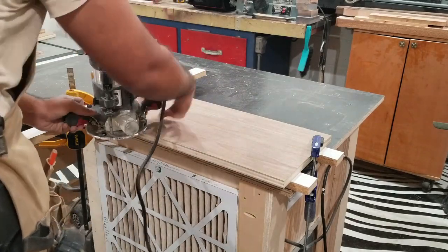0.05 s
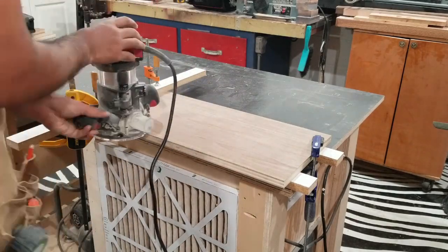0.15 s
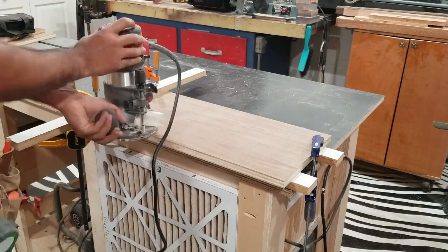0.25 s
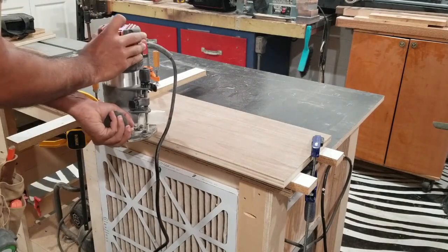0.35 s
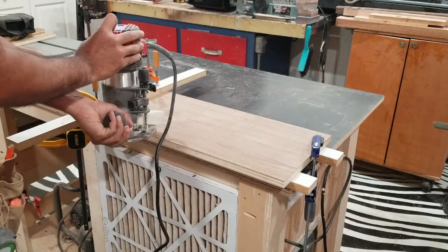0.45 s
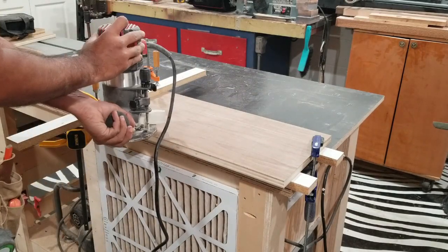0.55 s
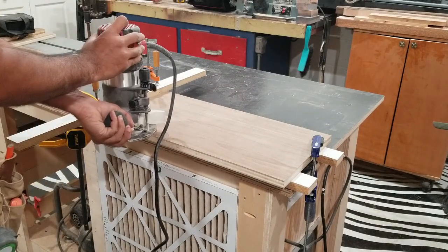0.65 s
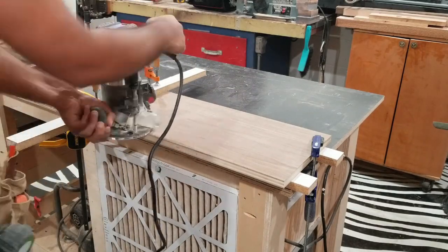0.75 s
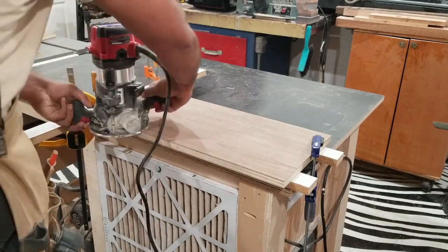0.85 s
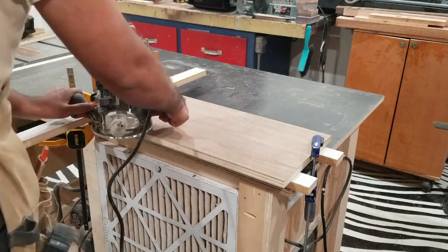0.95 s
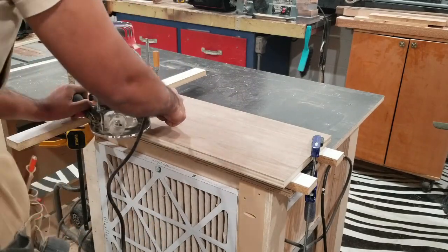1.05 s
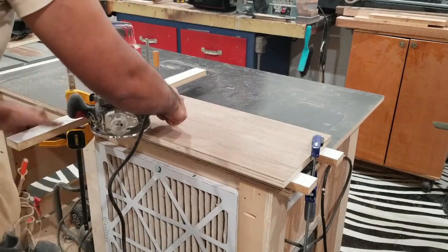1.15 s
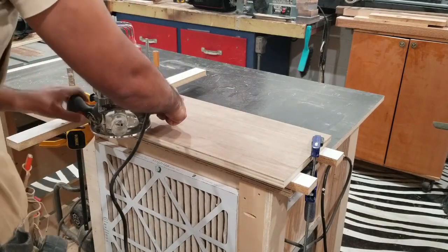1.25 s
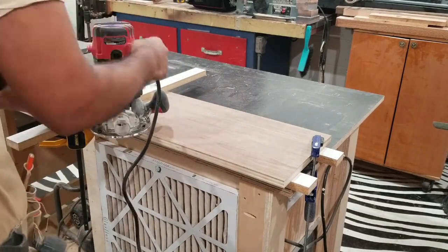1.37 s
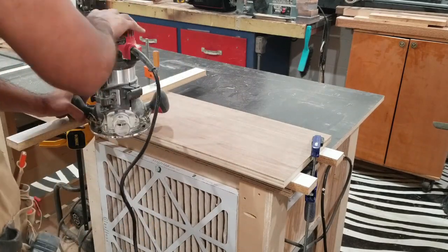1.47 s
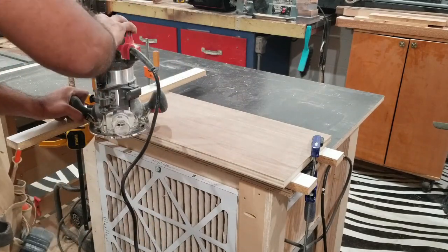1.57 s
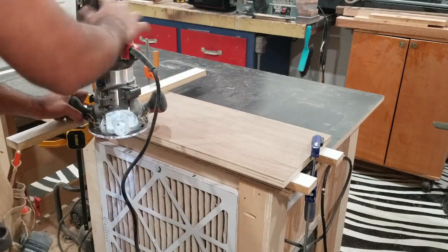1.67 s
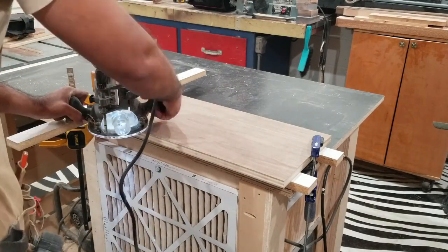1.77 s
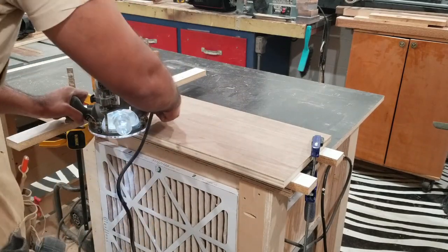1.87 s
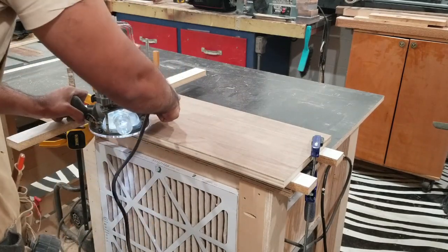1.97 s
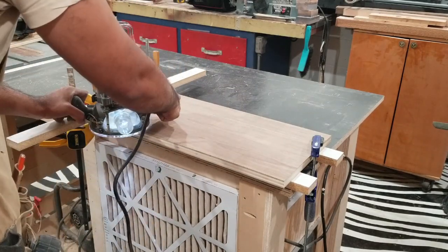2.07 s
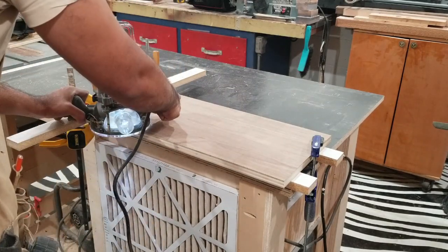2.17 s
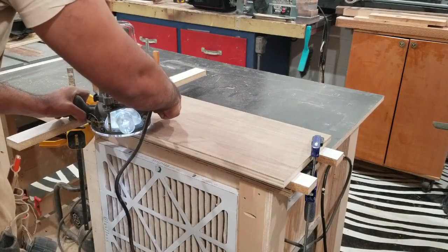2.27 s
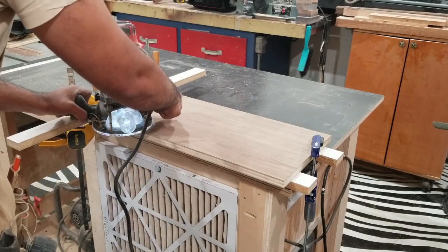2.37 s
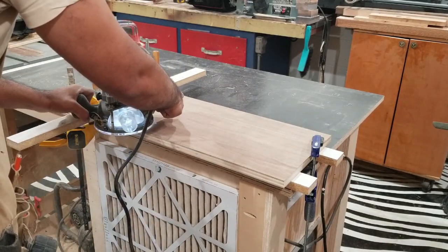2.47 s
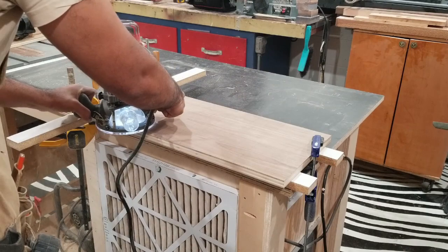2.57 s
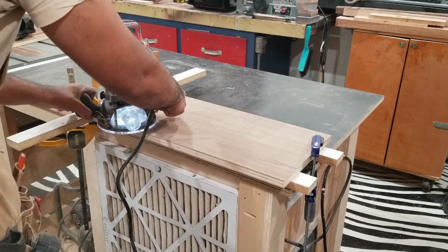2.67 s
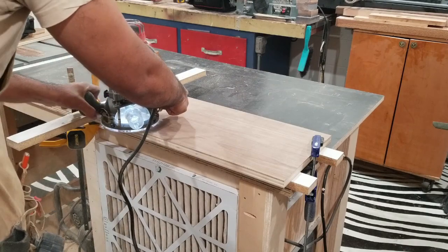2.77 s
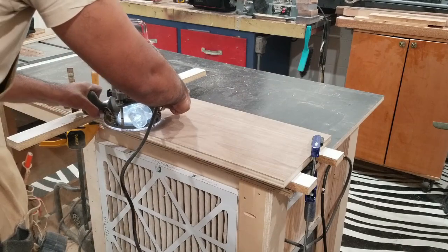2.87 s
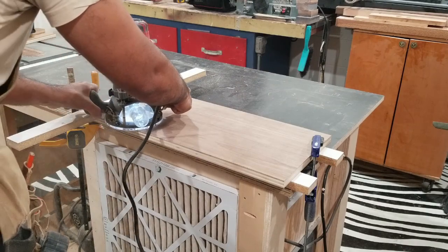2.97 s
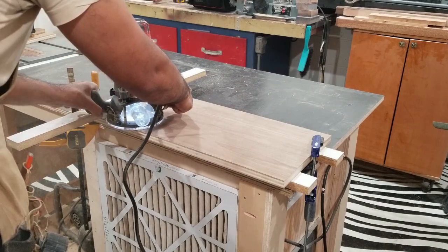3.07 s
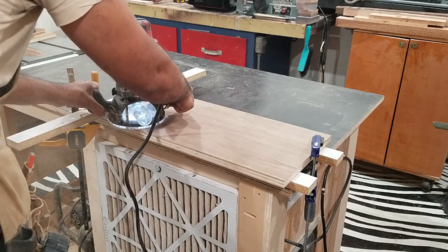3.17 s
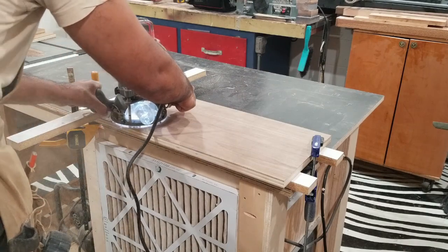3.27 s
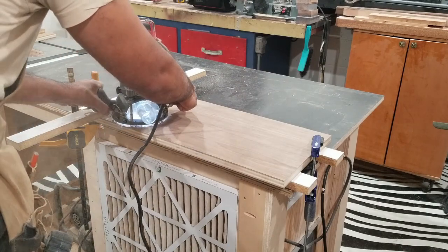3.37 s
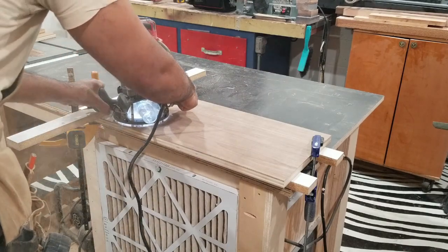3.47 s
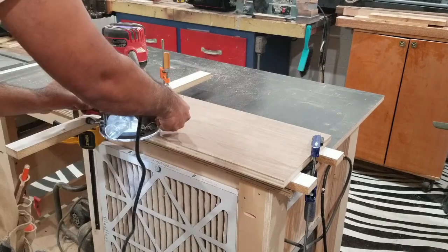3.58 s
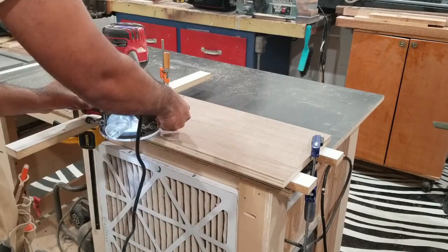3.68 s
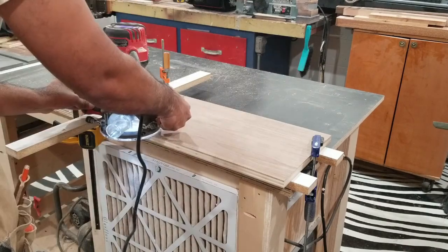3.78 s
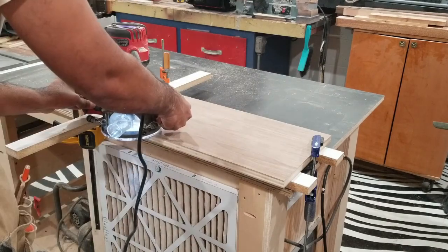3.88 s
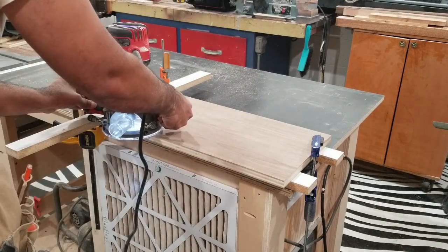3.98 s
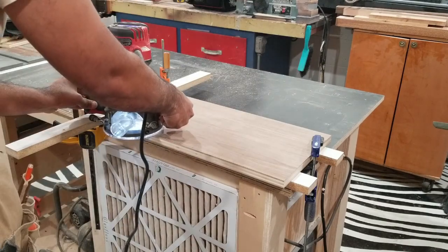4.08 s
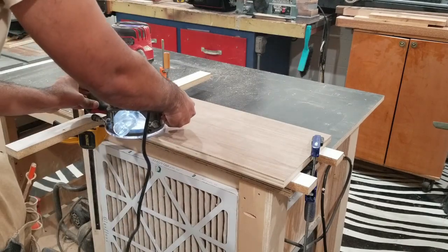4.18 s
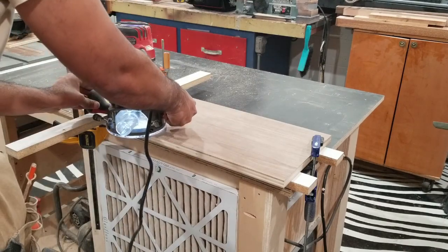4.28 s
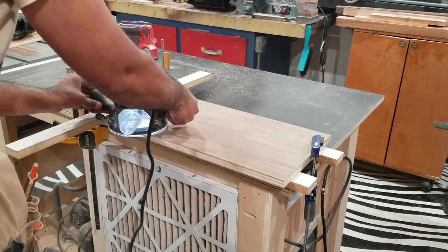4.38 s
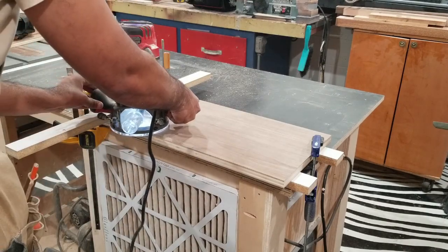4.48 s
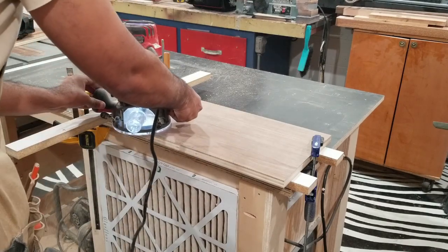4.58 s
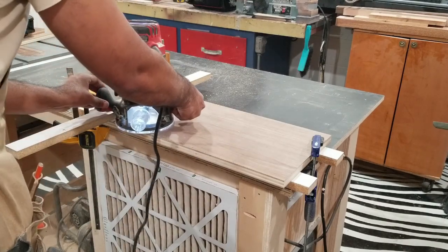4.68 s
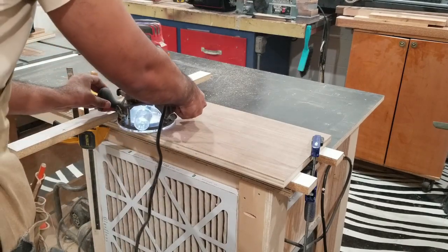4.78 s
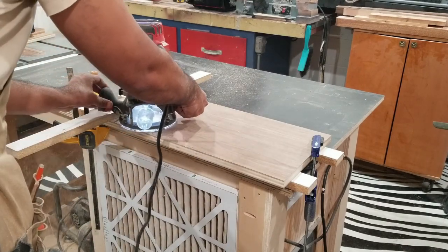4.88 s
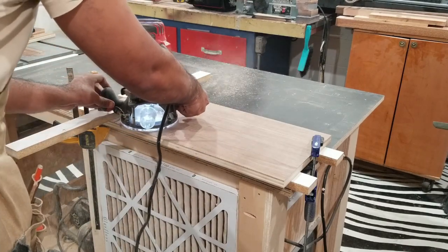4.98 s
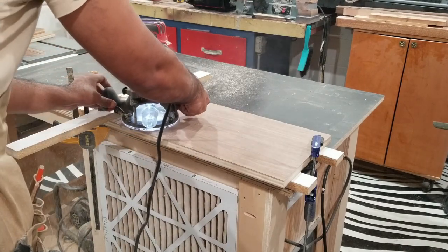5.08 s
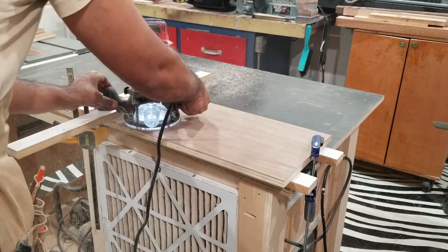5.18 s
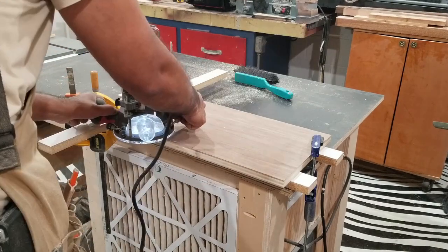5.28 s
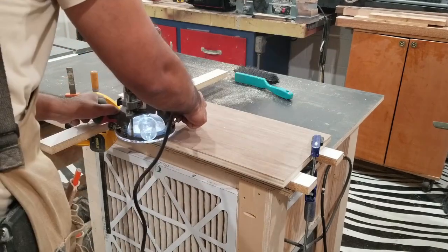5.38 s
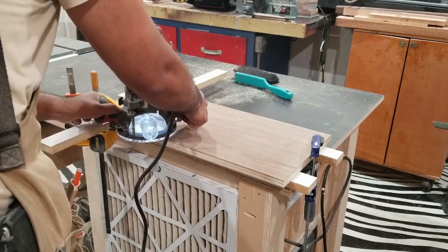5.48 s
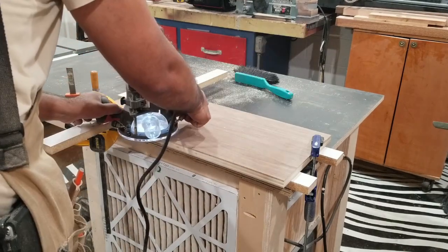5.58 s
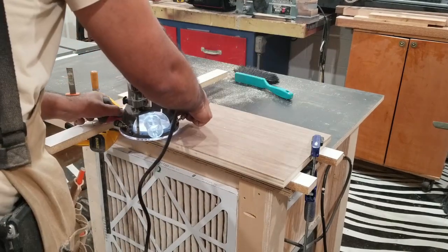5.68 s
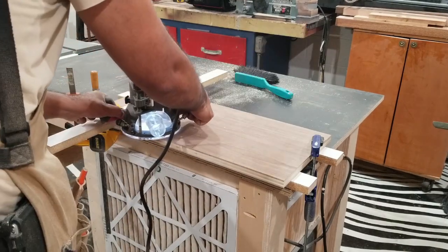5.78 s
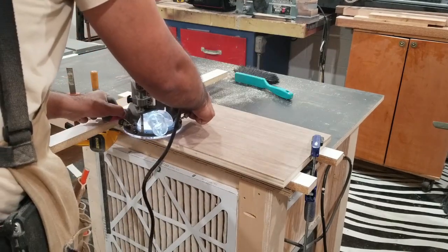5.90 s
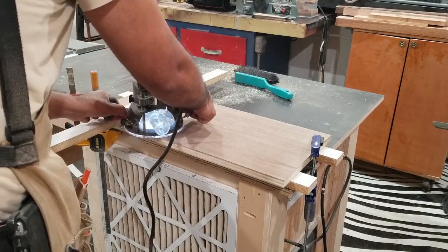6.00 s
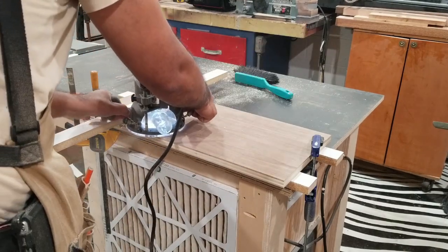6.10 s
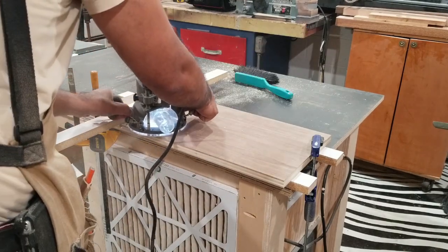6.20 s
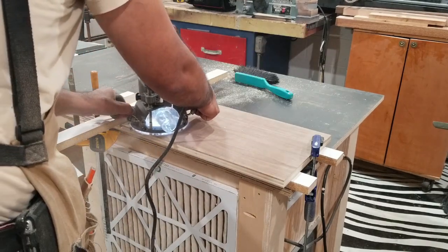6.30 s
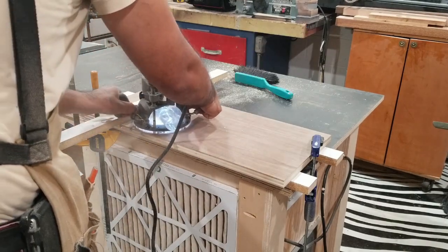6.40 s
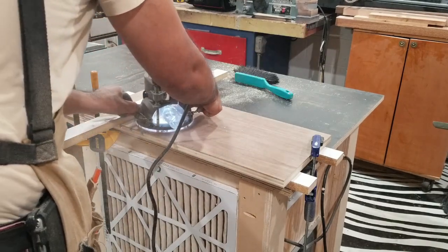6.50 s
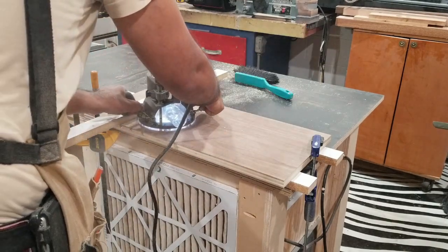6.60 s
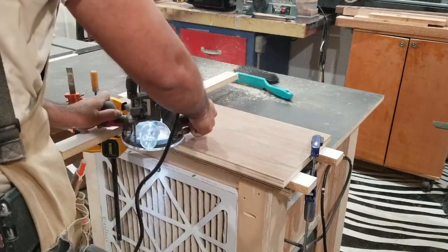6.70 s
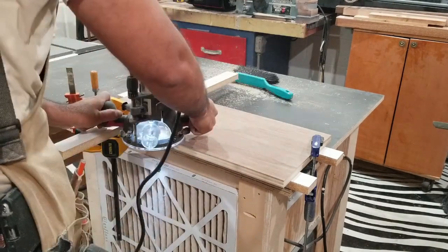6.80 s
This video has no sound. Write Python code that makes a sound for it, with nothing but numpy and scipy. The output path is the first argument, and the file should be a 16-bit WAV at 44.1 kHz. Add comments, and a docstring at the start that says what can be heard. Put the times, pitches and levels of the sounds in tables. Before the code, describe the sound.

A router is set down on plywood with light knocks, then spins up into a high, hissing whine that dips as it cuts.

```python
"""Home woodshop, six times too fast

A stereo microphone in the humming room, the work off to its left. A router is set down on plywood with
knocks and scuffs. The room tone fades; the motor buzzes on the mains, spins up and whines through six
passes joined by hard cuts. Speeding up without a filter folds what lies above the sampling rate back
down as hiss and a mirrored tone. Times and pitches are as heard."""
import sys
import numpy as np
from scipy import signal
from scipy.fft import rfft, irfft, next_fast_len
from scipy.io import wavfile
from scipy.ndimage import uniform_filter1d, map_coordinates

SR = 44100
rng = np.random.default_rng(int(sys.argv[2]) if len(sys.argv) > 2 else 0)


def persist_wave(psi):
    """Save psi, clipped to +-1, as 16-bit WAV."""
    counts = np.round(np.clip(psi, -1, 1) * 32767).astype(np.int16)
    wavfile.write(sys.argv[1], SR, np.atleast_2d(counts).T)


N = 302066
CRUISE_HZ, BOGGED_HZ = 2335, 2050  # shaft running free, fully loaded
SPIN_S, WAKE_S = 1.78, 0.27  # start of the spin-up, time the upper orders take to come in

# Router passes: start t/s, low and high band over the middle/dB, [hiss level/dB at even steps]
PASSES = [(1.872, -4, 0, [-56, -55.5, -55.5, -57, -54]), (2.858, -4, 1, [-56, -57.5, -55, -57, -56]),
          (3.545, -4.5, 0, [-52.5, -54, -53.5, -55.5, -54, -56.5, -55.5, -54]),
          (5.345, -4, 1, [-55, -55, -55.5, -56, -54.5]), (6.392, -5, 0.5, [-55.5, -58, -58]),
          (6.708, -5, .5, [-53.5, -54])]
# Squeal of the bit, shared by two bursts of chatter: f/Hz, width/Hz, level/dB
SQUEAL = [(8000, 300, -53.5), (11750, 400, -53), (15700, 150, -43)]


def whine():
    """The spinning motor's tones, whose levels shift with load and drift as the router travels."""
    # Shaft orders 1 and 2: t/s, level/dB of each
    low_orders = [(1.8, -54, -68), (1.83, -46.5, -66), (1.848, -67, -62), (1.865, -50, -60),
                  (1.89, -47.5, -56.5), (2.07, -48.5, -49), (2.3, -49.5, -58), (2.47, -53, -52.5),
                  (2.56, -49, -48.5), (2.66, -48.5, -46), (2.75, -51, -47), (2.78, -53, -51),
                  (2.856, -55, -58), (2.86, -51.5, -46), (3.06, -48, -48), (3.15, -52, -49),
                  (3.25, -51, -46), (3.35, -47.5, -50), (3.44, -48, -52), (3.544, -49.5, -52),
                  (3.548, -50.5, -50), (3.75, -47, -47.5), (4.04, -47.5, -43), (4.14, -44, -50),
                  (4.24, -48, -41.5), (4.43, -47.5, -45.5), (4.9, -49, -43), (5.3, -48.5, -38.5),
                  (5.5, -50, -40.5), (5.7, -48.5, -39), (5.85, -50, -42.5), (6.1, -52, -38.5),
                  (6.3, -50.5, -45), (6.37, -50, -40.5), (6.39, -56, -41), (6.395, -46, -46.5),
                  (6.708, -45.5, -46), (6.709, -53.5, -46), (6.85, -52, -44)]
    # Even steps through each pass: level/dB of orders 3 to 6 and of the slot tone
    pass_tones = [
        [(-64, -56, -68, -66, -52), (-54, -52.5, -63, -58, -55), (-58.5, -55.5, -60, -61, -51),
         (-61, -52.5, -56.5, -68, -58), (-64, -50.5, -64, -66, -64)],
        [(-69, -55, -64, -63, -59), (-68, -53, -69, -61, -58), (-51, -54, -64, -56, -55),
         (-61, -52, -55, -62, -60)],
        [(-65, -51.5, -55, -62, -49), (-61, -50, -62, -49, -52), (-61, -51.5, -66, -52, -54),
         (-62, -51.5, -70, -57, -56), (-62, -54, -68, -58, -54), (-60, -54, -71, -65, -58),
         (-52.5, -49, -67, -71, -55)],
        [(-54, -52, -70, -66, -56), (-54.5, -56, -62, -63, -52), (-55, -53, -65, -62, -52),
         (-63, -58, -69, -63, -53)],
        [(-62, -54, -67, -61, -60), (-60, -59, -67, -62, -60), (-59, -58, -66, -62, -61)],
        [(-70, -63, -66, -54, -51), (-66, -58, -65, -61, -48), (-58, -47, -62, -63, -57)],
    ]
    # Orders 1 to 6 and slot tone: change at full load/dB
    load_db = [-11.5, -4, -4, -2, -6, 8, -10]
    # The same seven tones: slow drift/dB
    wander_db = [0.56, 0.59, 1.7, 1.2, 2, 1.5, 1.1]
    speed_hz, load, roughness = shaft()
    shaft_hz = speed_hz + 1.2 * wobble(60)
    levels = zip([*curves(low_orders), *by_pass(pass_tones)], load_db, wander_db)
    *order_db, slot_db = [db + change * load ** 0.85 + drift * wobble(9) for db, change, drift in levels]
    out = shaft_orders(speed_hz, shaft_hz, order_db, roughness)
    out += slot_tone(shaft_hz, slot_db) + whistle(speed_hz, shaft_hz)
    return out * during(SPIN_S, 9, edge=0.054)


def shaft():
    """Speed in Hz with its spin-up, the load (0-1) its sag shows, and roughness (0-1) of its tones."""
    # The shaft sags under load, hunts and jumps at the cuts: t/s, f/Hz
    speed = [(1.95, 2340), (2.116, 2328), (2.403, 2334), (2.461, 2317), (2.54, 2351), (2.664, 2363),
             (2.72, 2310), (2.766, 2075), (2.856, 2056), (2.859, 2136), (2.94, 2132), (2.985, 2325),
             (3.013, 2365), (3.152, 2334), (3.251, 2335), (3.329, 2256), (3.402, 2407), (3.544, 2338),
             (3.925, 2336), (3.959, 2329), (4.066, 2348), (4.177, 2313), (4.281, 2366), (4.4, 2306),
             (4.441, 2346), (4.522, 2361), (4.6, 2327), (4.667, 2254), (4.748, 2080), (4.775, 2123),
             (4.824, 2317), (4.862, 2367), (4.914, 2331), (4.963, 2345), (5.007, 2333), (5.068, 2365),
             (5.158, 2331), (5.21, 2354), (5.28, 2337), (5.317, 2346), (5.37, 2308), (5.419, 2341),
             (5.518, 2356), (5.608, 2326), (5.669, 2342), (5.75, 2315), (5.84, 2328), (5.901, 2369),
             (5.973, 2344), (6.02, 2357), (6.069, 2315), (6.127, 2348), (6.191, 2307), (6.255, 2349),
             (6.3, 2336), (6.352, 2285), (6.397, 2050), (6.429, 2075), (6.45, 2050), (6.557, 2054),
             (6.621, 2030), (6.673, 2052), (6.7085, 2021), (6.709, 2322), (6.78, 2332), (6.85, 2322)]
    run_hz = curves(speed)[0]
    since = np.maximum(np.arange(N) / SR - SPIN_S, 0)
    lag_hz = 1135 * np.exp(-(since / .058) ** 2)
    load = np.clip((CRUISE_HZ - run_hz) / (CRUISE_HZ - BOGGED_HZ), 0, 1)
    glide = np.clip(abs(np.gradient(run_hz)) * SR / 2500, 0, 1)  # full at 2500 Hz/s
    roughness = np.maximum(uniform_filter1d(glide, SR // 50), .55 * load)
    return run_hz - lag_hz, load, roughness


def shaft_orders(speed_hz, shaft_hz, order_db, roughness):
    """Six harmonics of the shaft; gliding, they cross the room's nulls and drop out in short gaps."""
    # Each order at the microphone: left over right/dB, left lead/rad
    placement = [(12.5, 0.1), (7, 0.72), (19, .4), (12, 0.5), (10, .5), (11, .6)]
    # Colour of the first order: f over cruise/Hz, gain/dB
    colour = [(-61, 0), (-9, -1.5), (-1.5, 0), (24, 2.5), (70, -1.5)]
    # A reflection cancels the second order at a pitch that drifts as the router travels: t/s, f/Hz
    null = [(3.545, 4652), (5.2, 4678), (6.39, 4693)]
    # Each order: offset at full roughness/dB
    rough_db = [-0.5, 0, 2, -4, -3, -1]
    first, second, *upper = order_db
    first = first + np.interp(speed_hz - CRUISE_HZ, *np.transpose(colour))
    off_null = (2 * shaft_hz - curves(null)[0]) / 40  # in half widths
    notch_db = 10 * np.log10((off_null ** 2 + 0.046) / (off_null ** 2 + 1))
    second = second + during(null[0][0], null[-1][0]) * notch_db
    upper = [db - 16 * (1 - during(SPIN_S, 9, edge=WAKE_S)) for db in upper]
    levels = [db + roughness * (offset + 4 - 10 * abs(wobble(70)))
              for db, offset in zip([first, second, *upper], rough_db)]
    return sum(tone((k + 1) * shaft_hz, db, *placement[k], flicker_db=1.27)
               for k, db in enumerate(levels))


def slot_tone(shaft_hz, db, slots=18, fold_hz=48000):
    """The motor's slot tone, mirrored at fold_hz: it sweeps down as the shaft speeds up."""
    # The housing favours some pitches of the folded tone: f/Hz, gain/dB
    housing = [(4800, -3), (5450, 1.5), (5950, 0), (6350, -3), (7200, 6), (8200, -2)]
    mirror_hz = fold_hz - slots * shaft_hz + 55 * wobble(400)
    gaps_db = 4 * abs(wobble(30))
    surge_db = 10 * during(0, SPIN_S + WAKE_S, edge=WAKE_S)
    db = db - gaps_db + along(housing, abs(mirror_hz)) + surge_db
    folded = tone(mirror_hz, db, 7, 1.1, flicker_db=2.5) * (mirror_hz < SR / 2)
    return walls(folded, t60=.07, wet_db=-3)


def whistle(speed_hz, shaft_hz):
    """A thin whistle swinging nine times as far as the shaft, with a partner one shaft order higher."""
    # Course of the whistle: t/s, f at cruise/Hz, level/dB
    course = [(3.553, 12700, -70), (3.756, 12770, -65), (3.852, 13390, -65), (3.94, 13340, -54),
              (4.1, 13320, -53), (4.3, 13230, -59), (4.505, 13130, -57), (4.661, 13250, -58),
              (4.72, 13300, -70), (4.82, 13300, -68), (4.911, 13120, -59), (5.3, 13220, -57),
              (5.62, 13210, -65), (6.0, 13130, -61), (6.368, 13110, -58)]
    hz, db = curves(course)
    hz = hz + np.maximum(9 * (speed_hz - CRUISE_HZ), -650)
    lower = tone(hz + 30 * wobble(200), db + 1.5, 7, .9, flicker_db=2.2)
    upper = tone(hz + shaft_hz + 30 * wobble(200), db - 6, 7, .9, flicker_db=3)
    return (lower + upper) * during(course[0][0], course[-1][0], edge=0.03)


def hiss():
    """Fan air and chips: spiky, patchy noise in three overlapping bands, unrelated left and right."""
    # Hiss spectrum: f/Hz, gain/dB
    spectrum = [(25, -1.5), (50, -2), (300, -2), (1000, -1.5), (2000, -1), (3500, 2), (5500, 2), (8000, 2),
                (11000, 2.5), (14000, 4.5), (15800, 2.5)]
    # Balance at the microphone: f/Hz, left over right/dB
    balance = [(60, 13.5), (150, 13), (380, 13), (950, 12.5), (2380, 10.5), (5980, 6.5), (15000, 6.5)]
    spiky = rng.standard_normal((2, N)) * amp(1.02 * wobble(1500) + 0.31 * wobble(12))
    frames = signal.stft(spiky, nperseg=512)[2]
    patches = uniform_filter1d(uniform_filter1d(rng.standard_normal(frames.shape[1:]), 6, 0), 10, 1)
    patchy = signal.istft(frames * amp(0.99 * patches / patches.std()), nperseg=512)[1][:, :N]
    noise = filtered(patchy, lambda hz: amp(along(spectrum, hz)) * sides(along(balance, hz)))
    low = filtered(noise, lambda hz: along([(1200, 1), (2600, 0)], hz))
    high = filtered(noise, lambda hz: along([(3900, 0), (9900, 1)], hz))
    layers = low, noise - low - high, high
    bands = (300, 1200), (2600, 3900), (9900, 11400)
    out = sum(amp(db) * x / band_rms(noise, *band) for db, x, band in zip(hiss_levels(), layers, bands))
    return out * during(1.664, 9, edge=.005)


def hiss_levels():
    """Low, middle and high hiss in dB: it rises with the motor, surges, and dips under load."""
    # Hiss as the motor starts: t/s, low, middle and high level/dB
    start = [(1.666, -92, -75, -96), (1.69, -91, -75, -86), (1.72, -83, -71, -74), (1.75, -83, -68, -68),
             (1.78, -64.5, -58.5, -62.5), (1.81, -61.5, -54.5, -55), (1.84, -54, -50, -51),
             (1.872, -55.5, -54, -51)]
    since = np.arange(N) / SR - PASSES[0][0]
    _, load, _ = shaft()
    running_db = by_pass([[(db + low, db, db + high) for db in steps] for _, low, high, steps in PASSES])
    surge_db = 3.5 * np.exp(-abs(since) / 0.1)
    return np.where(since < 0, curves(start), running_db - 1.5 * load + surge_db)


def coil_buzz(buzz_hz=362):
    """The field coils buzz on the mains at switch-on; odd harmonics are weaker."""
    # Buzz spectrum: f/Hz, level/dB
    spectrum = [(360, -100), (720, -82.5), (2180, -77), (3700, -87), (5070, -77.5), (6520, -73),
                (7600, -76), (9000, -93), (10600, -81), (12700, -87)]
    # Swell: t/s, gain/dB
    swell = [(1.664, -30), (1.67, -6), (1.7, 2), (1.73, 6.5), (1.76, -4), (1.8, -12)]
    swell_db = curves(swell)[0]
    out = np.zeros((2, N))
    for k in range(2, 36):
        db = along(spectrum, k * buzz_hz) - 3 * (k % 2) + swell_db
        out += tone(np.full(N, k * buzz_hz), db, 8.9, .3, flicker_db=5.0)
    return out * during(1.66, 1.8)


def bit_chatter():
    """The bit chatters and squeals in heavy cuts."""
    # Bursts: start t/s, end t/s, [(f/Hz, width/Hz, level/dB)]
    bursts = [(2.74, 2.795, SQUEAL), (2.812, 2.86, SQUEAL), (6.382, 6.706, [(200, 520, -58.5),
              (5970, 150, -66), (8000, 460, -58.5), (11900, 160, -55.5), (13960, 150, -59),
              (15600, 300, -69)])]
    return sum(noise_lines(*burst) for burst in bursts)


def knocks(t60=0.044):
    """Short noisy blows ring the plywood; modes near each blow's own pitch are favoured."""
    # Blows on the panel: t/s, peak level/dB, favoured f/Hz
    blows = [(0.074, -69, 719), (0.172, -59.5, 635), (0.32, -60.5, 557), (0.434, -76, 525),
             (0.783, -71, 501), (0.819, -51, 538), (0.832, -47, 880), (0.856, -43, 1620),
             (0.871, -51, 1220), (0.902, -58, 864), (0.937, -50.5, 476), (0.969, -61, 565),
             (1.096, -50, 1030), (1.217, -68, 651), (1.259, -72, 888), (1.481, -73, 540)]
    # Plywood modes: f/Hz, width/Hz, gain/dB
    modes = [(457, 82, -1), (542, 75, 0.5), (647, 71, 0), (863, 95, 1), (1063, 75, -0.5), (1244, 49, -2),
             (1610, 110, -3.5), (2380, 300, -12.5), (3020, 380, -15)]
    out, t = np.zeros((2, N)), np.arange(SR // 8) / SR
    for s, db, hz in blows:
        def plywood(f):
            return sum((-1) ** k * amp(gain - 8.1 * abs(np.log2(centre / hz)))
                       * 1j * f * width / (centre ** 2 - f ** 2 + 1j * f * width)
                       for k, (centre, width, gain) in enumerate(modes))
        noise = rng.standard_normal(len(t)) + .5 * rng.standard_normal((2, len(t)))
        blow = noise * amp(-60 * t / t60) * (1 - np.exp(-t / 0.0021))
        ring = filtered(blow, plywood) * sides(8.1)[:, None]
        at = round(s * SR)
        out[:, at:at + len(t)] += amp(db) * ring / abs(ring.mean(0)).max()
    return out


def scuffs(decay_s=0.016):
    """Hands, cord and base plate brushing: short gritty puffs."""
    # Contacts: t/s, level/dB, centre f/Hz, breadth/octaves
    contacts = [(0.0044, -62, 14400, 1.6), (0.146, -49.5, 13400, 0.26), (0.16, -54, 11000, 1.4),
                (0.211, -48.5, 13000, 6.1), (0.239, -49, 12200, 4.4), (0.286, -57, 9860, 1.6),
                (0.311, -61, 4320, 1.5), (0.826, -58, 5960, 1.6), (0.862, -52, 12400, 2),
                (0.899, -57, 6950, 1.2), (0.9444, -63, 6090, 1.6), (1.028, -54, 8040, 1.6),
                (1.0494, -59, 13000, 1.6), (1.06, -55.5, 8680, 2.5), (1.093, -52.5, 7390, 3),
                (1.249, -68, 3700, 0.85), (1.445, -76, 7040, 1.6), (1.643, -73, 4380, 1.6)]
    out, t = np.zeros((2, N)), np.arange(SR // 8) / SR
    envelope = (1 - np.exp(-t / 0.0047)) * np.exp(-(t / decay_s) ** 1.05)
    for s, db, hz, breadth in contacts:
        noise = rng.standard_normal((2, len(t)))
        puff = filtered(noise, lambda f: np.exp(-.5 * (np.log2((f + 1) / hz) / breadth) ** 2) + 0.18)
        at = round(s * SR)
        out[:, at:at + len(t)] += amp(db - 7) * unit(puff * sides(14)[:, None]) * envelope
    return out


def plate_squeak():
    """The base plate slips with a faint squeak."""
    # One slip: start t/s, end t/s, [(f/Hz, width/Hz, level/dB)]
    slip = (.795, 0.834, [(5870, 450, -74.5), (7000, 500, -80), (2980, 200, -87)])
    return noise_lines(*slip)


def room_tone():
    """Mains hum, a low drone partly shared by both channels, and diffuse air hiss, all fading out."""
    # Fade: t/s, hum and drone level/dB, air level/dB
    fade = [(0.0, -69.5, -75.5), (0.554, -71, -78), (0.786, -70, -77), (0.922, -70.5, -78.5),
            (1.122, -77.5, -84), (1.406, -82.5, -90), (1.524, -83.5, -92.5), (1.7, -97, -101)]
    # Hum lines: f/Hz, level/dB
    hum_lines = [(359, -73), (560, -84), (718, -90)]
    # Drone spectrum: f/Hz, gain/dB
    drone_colour = [(12, -60), (25, -27), (150, -19), (220, -9.5), (300, 1.5), (350, 2.5), (420, -9),
                    (560, -9), (700, -8.5), (1090, -16), (2500, -30.5), (5500, -120)]
    # Air spectrum: f/Hz, gain/dB
    air_colour = [(710, -39), (1200, -11), (1570, -6), (2420, -3.5), (2840, -5), (3490, -5), (10500, -5.5),
                  (15800, -2.5)]
    hum_db, air_db = curves(fade)
    hum = sum(tone(hz + 2.5 * wobble(15), db, 4, 0, flicker_db=2.2) for hz, db in hum_lines)
    noise = rng.standard_normal(N) + 1.34 * rng.standard_normal((2, N))
    drone = filtered(noise, lambda hz: amp(along(drone_colour, hz)))
    air = filtered(rng.standard_normal((2, N)), lambda hz: amp(along(air_colour, hz)))
    out = amp(hum_db - hum_db[0] - 0.5) * hum
    out += amp(hum_db - 1.5) * unit(drone * sides(2.8)[:, None])
    out += amp(air_db + 2.5) * unit(air * sides(3.7)[:, None])
    return out * during(-1, 1.8, edge=.1)


def walls(x, t60, wet_db):
    """The walls add a short diffuse tail, which breaks gliding tones into uneven pieces."""
    t = np.arange(SR // 5) / SR
    tail = rng.standard_normal((2, len(t))) * amp(-60 * t / t60)
    wet = signal.fftconvolve(x, tail / np.linalg.norm(tail, axis=1, keepdims=True), axes=1)[:, :N]
    return (x + amp(wet_db) * wet) / np.sqrt(1 + amp(2 * wet_db))


def noise_lines(start, end, modes):
    """Narrow bands of noise between two times, uneven in level and well to the left."""
    out = np.zeros((2, N))
    for hz, width, db in modes:
        noise = rng.standard_normal(N) + 0.52 * rng.standard_normal((2, N))
        line = filtered(noise, lambda f: 1 / (1 + (2 * (f - hz) / width) ** 2))
        out += amp(db) * unit(line * sides(15.0)[:, None])
    return out * during(start, end) * amp(1.5 * wobble(30))


def tone(hz, db, side_db, lead, flicker_db):
    """A gliding, flickering sine, side_db louder and lead radians earlier on the left."""
    phase = 2 * np.pi * np.cumsum(hz) / SR + rng.uniform(0, 2 * np.pi)
    gain = sides(side_db)
    level = np.sqrt(2) * amp(db + flicker_db * np.array([wobble(45), wobble(45)]))
    return gain[:, None] / gain.mean() * level * np.sin(phase + np.array([[lead / 2], [-lead / 2]]))


def by_pass(points):
    """Curves through evenly spaced points in each pass, jumping at the cuts."""
    cuts = [row[0] for row in PASSES] + [N / SR]
    return curves([(s, *row) for k, rows in enumerate(points)
                   for s, row in zip(np.linspace(cuts[k], cuts[k + 1] - 1 / SR, len(rows)), rows)])


def curves(rows):
    """One value per sample for each column after the time."""
    times, *columns = np.transpose(rows)
    return np.array([np.interp(np.arange(N) / SR, times, column) for column in columns])


def along(points, hz):
    """Interpolates (f/Hz, value) points on a log axis."""
    freqs, values = np.transpose(points)
    return np.interp(np.log(hz + 1), np.log(freqs + 1), values)


def during(start, end, edge=0.0075):
    """1 between two times, with ramps of edge seconds."""
    t = np.arange(N) / SR
    return np.clip(np.minimum(t - start, end - t) / edge, 0, 1)


def wobble(rate):
    """A smooth random curve, rate knots a second."""
    return map_coordinates(rng.standard_normal(int(N * rate / SR) + 4), [np.arange(N) * rate / SR])


def filtered(x, response):
    """x through a frequency response."""
    size = next_fast_len(x.shape[-1] + 8192)
    return irfft(rfft(x, size) * response(np.fft.rfftfreq(size, 1 / SR)), size)[..., :x.shape[-1]]


def band_rms(x, lo, hi):
    """Rms of the channel mean inside a band."""
    return np.std(filtered(x.mean(0), lambda hz: (hz > lo) & (hz < hi)))


def unit(x):
    """Scales the channel mean to rms 1."""
    return x / np.sqrt(np.mean(np.atleast_2d(x).mean(0) ** 2) + 1e-20)


def sides(db):
    """Left and right gains for a balance in dB."""
    return amp(np.array([db / 2, -db / 2]))


def amp(db):
    return 10 ** (np.asarray(db) / 20)


def scene():
    """Router, room and handling as they reach the microphone."""
    router = coil_buzz() + bit_chatter() + whine() + hiss()
    return router + room_tone() + knocks() + scuffs() + plate_squeak()


def record(dry):
    """The recorder keeps nothing above its band limit."""
    top_hz = 15960
    return filtered(dry, lambda hz: np.sin(np.pi / 2 * np.clip((top_hz - hz) / 120, 0, 1)) ** 2)


dry = scene()
out = record(dry)
persist_wave(out)
```